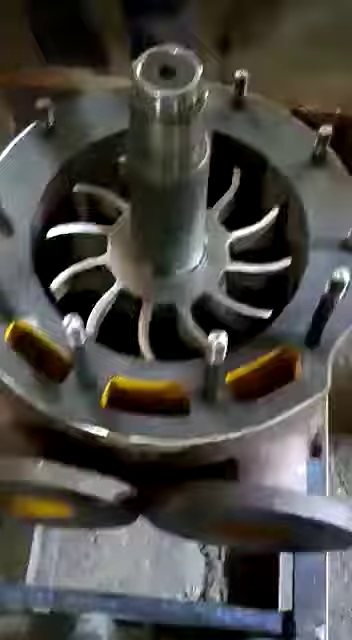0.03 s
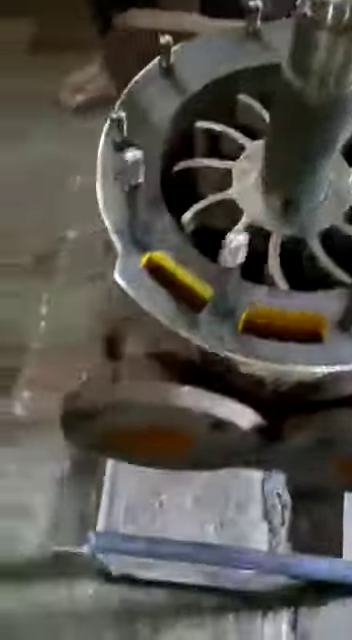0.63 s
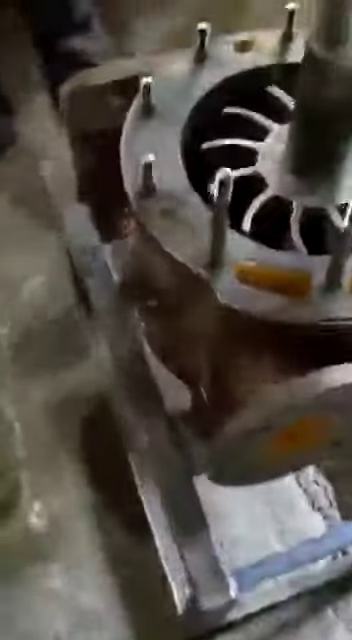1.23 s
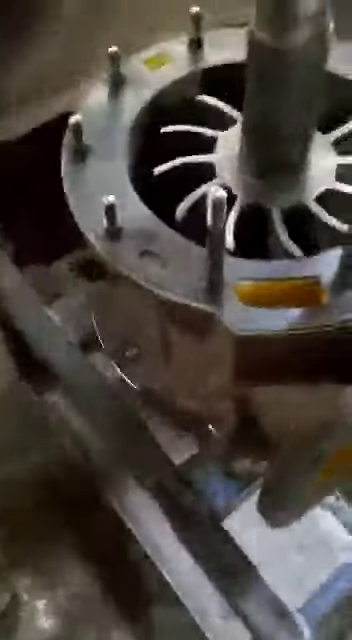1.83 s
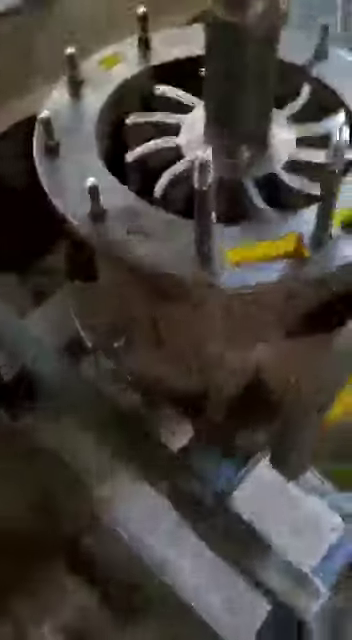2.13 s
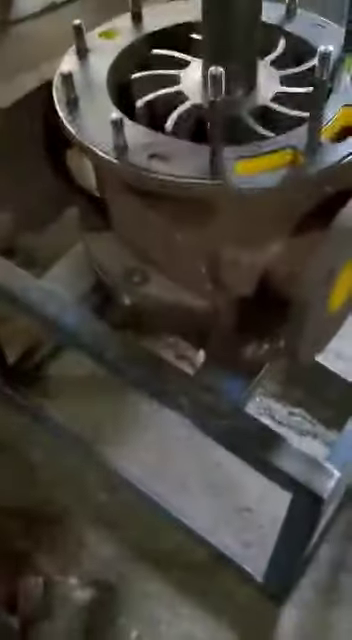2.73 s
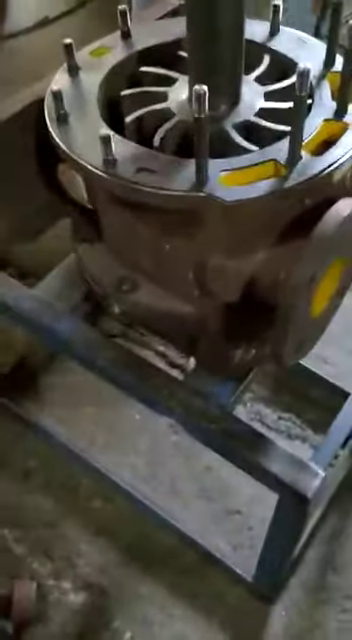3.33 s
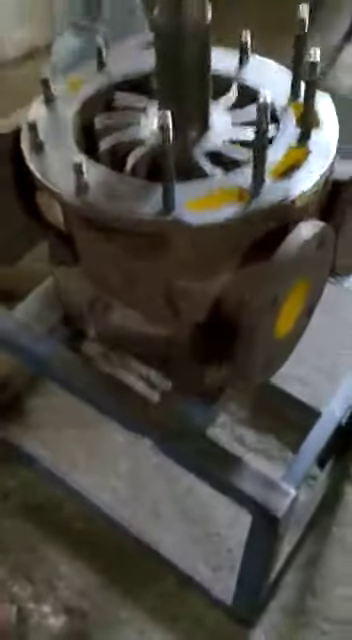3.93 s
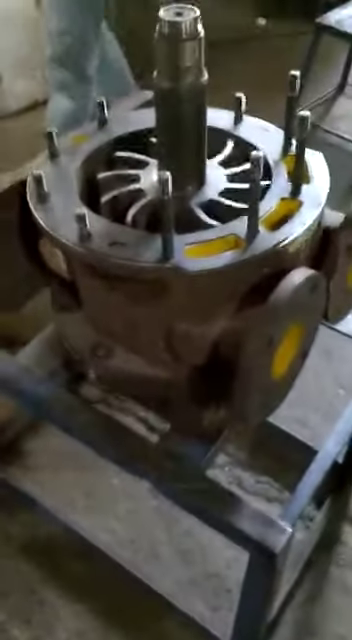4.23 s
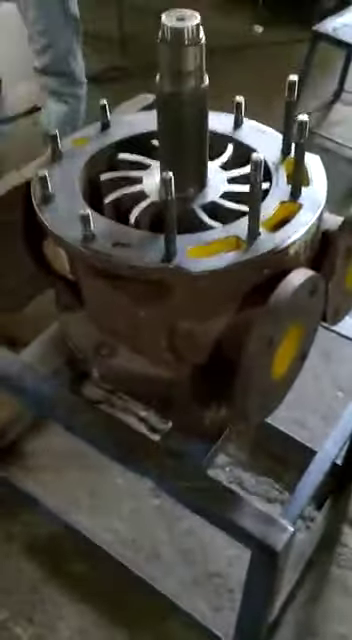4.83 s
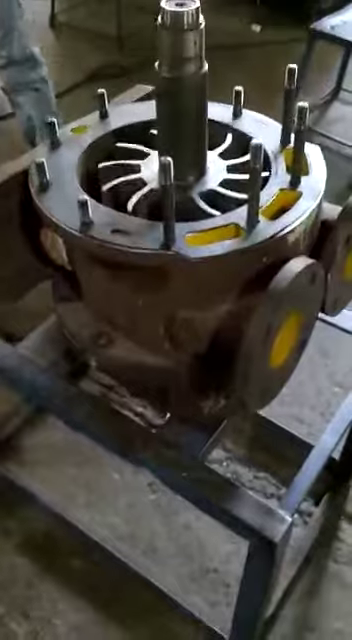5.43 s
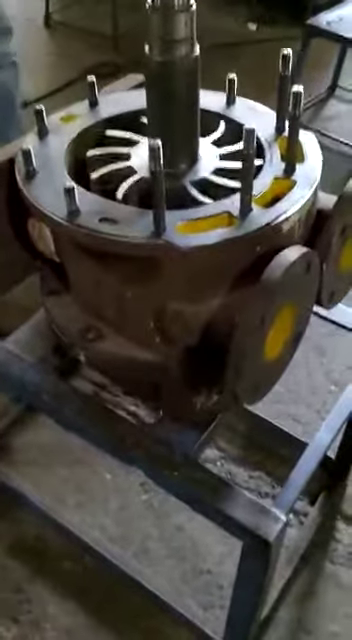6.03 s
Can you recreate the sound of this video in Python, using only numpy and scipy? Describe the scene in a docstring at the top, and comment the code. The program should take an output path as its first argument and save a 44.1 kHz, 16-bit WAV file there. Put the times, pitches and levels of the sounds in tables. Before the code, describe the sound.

A machine runs steadily in a hard-walled workshop. Its fan holds one strong, low, fluttering tone, with thin motor whines above it and a broad roar of air behind. The tones swell and dip slightly as a hand-held microphone moves around. A soft bump comes early, then a weaker one, two faint ticks with another dull bump midway, and one small sharp click near the end.

```python
"""Workshop machine with a singing fan

A machine runs steadily in a hard-walled workshop while a hand-held microphone moves round a dismantled
pump. The fan blades sing one strong tone, fluttered by the turning shaft, with thin motor whines over a
broad roar of air. Echoes form loud and quiet spots in the room (standing waves), so tones and roar swell
and fade as the microphone moves. The sound fades in; soft bumps, two faint ticks and a click join it."""
import sys
import numpy as np
from scipy import signal
from scipy.fft import rfft, irfft, next_fast_len
from scipy.io import wavfile
from scipy.ndimage import map_coordinates

SR = 44100
rng = np.random.default_rng(int(sys.argv[2]) if len(sys.argv) > 2 else 0)


def unload_wav(signal):
    """Save mono or channel-first audio to the path in sys.argv[1] as 16-bit WAV at rate SR, clipped to [-1, 1]."""
    wavfile.write(
        sys.argv[1],
        SR,
        np.round(np.clip(np.atleast_2d(signal).T, -1, 1) * 32767).astype(np.int16),
    )


N = 268569
TIME = np.arange(N) / SR

# how alike left and right sound (1 the same, 0 unrelated, -1 opposite): pitch_hz, likeness
EAR_LIKENESS = [(30, -0.3), (60, 1), (130, 0.87), (300, 1), (580, 0.51), (1240, -0.23), (2600, 0.05),
                (6000, -0.011)]


def from_db(db):
    """Turn decibels into a gain to multiply by."""
    return 10 ** (np.asarray(db) / 20)


def in_time(rows):
    """Join a table's timed points with straight lines, giving one curve per value column."""
    times, *columns = np.transpose(rows)
    return [np.interp(TIME, times, column) for column in columns]


def at_hz(points, hz):
    """Read a table between its pitches, with every octave equally wide."""
    pitches, values = np.transpose(points)
    return np.interp(np.log(hz), np.log(pitches), values)


def pan(balance_db):
    """Left and right gains that keep the total power; a positive balance leans left."""
    gains = from_db(np.array([[.5], [-.5]]) * balance_db)
    return gains / np.sqrt(np.mean(gains ** 2, axis=0))


def drift(rate):
    """A smooth random wobble of size about 1, with `rate` new values a second."""
    points = rng.standard_normal(2048)
    coarse_s = TIME[::64]
    return np.interp(TIME, coarse_s, map_coordinates(points, [coarse_s * rate], mode="wrap"))


def bell(x, centre, half_width):
    """A smooth hump of height 1."""
    return np.exp(-((x - centre) / half_width) ** 2)


def room_tone(hz, echo, rate):
    """A pure tone plus its wall echoes, whose sum shifts as the microphone moves."""
    shared = drift(rate) + 1j * drift(rate)   # complex numbers hold both strength and phase
    per_side = np.array([drift(rate) + 1j * drift(rate) for _ in range(2)])
    alike = np.clip(at_hz(EAR_LIKENESS, hz), 0, 1)
    reflections = (np.sqrt(alike) * shared + np.sqrt(1 - alike) * per_side) / np.sqrt(2)
    side_phase = (1 - alike) * np.pi / 4 * rng.choice([-1, 1]) * np.array([[1], [-1]])
    combined = (np.exp(1j * side_phase) + echo * reflections) / np.sqrt(1 + echo ** 2)
    return np.sqrt(2) * np.real(combined * np.exp(2j * np.pi * (hz * TIME + rng.random())))


def fan_tones(blade_hz=297.8, shaft_hz=31.0, throb=0.28, blade_trim_db=-0.42, overtone_trim_db=0.35):
    """Passing blades make a tone and overtones; the shaft adds a throb each turn, and side tones."""
    # the blade tone along the microphone's path: time_s, level_db (before trim), balance_db
    blade_path = [(0.45, -20.5, -5), (0.73, -19, -4.1), (1.0, -21, -3.4), (1.12, -21, -4.5),
                  (1.28, -17.5, -4), (1.45, -20, -4.2), (1.9, -18.5, -5), (2.1, -17.6, -4.2),
                  (2.25, -18.5, -4), (2.67, -17.5, -2.5), (2.95, -17, -2.5), (3.17, -19, -2.5),
                  (3.33, -15.5, -3.5), (3.6, -19, -3.5), (3.93, -17, -3), (4.28, -19, -2.7),
                  (4.45, -17, -3), (5.3, -19, -3), (5.5, -17, -3), (6.0, -18.5, -2.5)]
    # tones at 2, 3, 4 and 5 times the blade pitch along that path: time_s, level_db (before trim)
    second = [(0.45, -37), (0.66, -39), (0.8, -27), (1.02, -28.5), (1.42, -30.5), (1.72, -38.5),
              (2.15, -30), (2.38, -40), (2.65, -44), (3.7, -42), (4.45, -36.5), (5.0, -38.5), (6.0, -40)]
    third = [(0.4, -40), (1.4, -53), (1.95, -39.5), (2.5, -35.5), (3.05, -50), (3.9, -38), (5.0, -41),
             (5.9, -42)]
    fourth = [(0.35, -42), (0.7, -31), (1.0, -34), (2.15, -48), (2.55, -33.5), (3.2, -31), (4.35, -36),
              (4.75, -39), (5.0, -33), (5.4, -39), (5.9, -37)]
    fifth = [(0.6, -42), (1.1, -37), (1.9, -54), (2.15, -41), (3.2, -39), (4.7, -38), (5.9, -40)]
    # side tones from the shaft: blade_multiple, shaft_multiple, level_db, balance_db
    side_tones = [(1, 2, -39, -7), (1, 3, -42.5, -4.5)]
    # the side tone just above twice the blade pitch: time_s, level_db (before trim)
    high_side_path = [(0.7, -47), (1.0, -41), (1.6, -67), (2.4, -48), (2.8, -34), (3.05, -45),
                      (3.75, -34.5), (4.8, -38), (5.7, -47)]

    blade_db, blade_balance_db = in_time(blade_path)
    level = from_db(blade_db + blade_trim_db + 0.5 * drift(10))
    shaft_turns = shaft_hz * TIME + 0.013 * drift(3.05)
    flutter = 1 + throb * np.sin(2 * np.pi * shaft_turns)
    out = level * flutter * pan(blade_balance_db) * room_tone(blade_hz, echo=0.092, rate=9)
    overtone_trim = from_db(overtone_trim_db)
    for multiple, path, balance_db, echo in [(2, second, -8, 0.27), (3, third, -25, 0.65),
                                             (4, fourth, -9, 0.29), (5, fifth, -18, 0.54)]:
        level = overtone_trim * from_db(in_time(path))
        out += level * pan(balance_db) * room_tone(multiple * blade_hz, echo, rate=3.32)
    for blade_multiple, shaft_multiple, level_db, balance_db in side_tones:
        hz = blade_multiple * blade_hz + shaft_multiple * shaft_hz
        out += from_db(level_db) * pan(balance_db) * room_tone(hz, echo=0.32, rate=2.7)
    level = overtone_trim * from_db(in_time(high_side_path))
    return out + level * pan(-1) * room_tone(2 * (blade_hz + shaft_hz), echo=0.24, rate=3.5)


def motor_whine(thin_trim_db=-0.5):
    """The motor makes two clear whines, and thinner tones that waver with their wall echoes."""
    # the two clear whines along the microphone's path: time_s, level_db
    lower_path = [(0.4, -47), (1.0, -37), (1.3, -47), (1.55, -35), (1.95, -34), (2.3, -39.5), (3.5, -49)]
    upper_path = [(0.35, -29), (0.8, -27), (1.1, -42), (1.6, -30), (2.1, -36), (2.6, -37), (3.8, -33),
                  (5.05, -37.5), (5.35, -43), (5.8, -30)]
    # a low hum and thin whines: pitch_hz, level_db (before trim), balance_db
    thin_tones = [(77.3, -48.5, -2), (795.0, -45.5, -7), (1064.6, -46, -11), (1089.3, -45, -1),
                  (1114.2, -43, -6), (1125.3, -44, -5), (1175.6, -42.5, -9), (1217.1, -37, -11),
                  (1266.9, -43, 1), (1299.5, -42.5, -4), (1343.0, -44, -4), (1395.0, -47, -5),
                  (1420.3, -47, -5), (1458.0, -46, -10), (2779.3, -50.5, -9), (3474.3, -53, -7)]

    out = from_db(in_time(lower_path)) * pan(-2) * room_tone(hz=701.3, echo=0.51, rate=5.8)
    out += from_db(in_time(upper_path)) * pan(-1) * room_tone(hz=1150.4, echo=0.25, rate=5.18)
    for hz, level_db, balance_db in thin_tones:
        out += from_db(level_db + thin_trim_db) * pan(balance_db) * room_tone(hz, echo=0.9, rate=4.03)
    return out


def ring_boost(resonances, hz):
    """The boost in decibels near the pitches at which something likes to ring."""
    return sum(db / (1 + (2 * (hz - centre) / width) ** 2) for centre, width, db in resonances)


def air_roar(motor_hz=24.8, throb=0.024, ripple_db=1.25, ripple_hz=14, hiss_stretch=2.2):
    """Swirling air roars through the housing: alike on both sides in the bass, spread out up high."""
    # the roar's basic shape, before any boosts: pitch_hz, level_db
    roar_shape = [(25, -65), (40, -62), (55, -58), (90, -56.5), (110, -52.5), (145, -51.5), (175, -53),
                  (215, -53), (260, -53), (520, -61), (850, -59.5), (1000, -58.5), (1900, -59.5),
                  (3800, -73), (5500, -77), (6300, -81.5), (9500, -87), (11500, -92), (12550, -100),
                  (13100, -118), (14000, -150)]
    # where the housing and the room ring: pitch_hz, width_hz, boost_db
    housing_rings = [(106, 17, 4), (174.4, 22.5, 4.5), (384.6, 137, 9.5), (668, 182, 7), (919, 17, 6),
                     (1176, 47, 7), (1301, 173, 8.5), (1424, 57, 2), (3310, 430, 0.75)]
    # where the microphone's right opening rings: pitch_hz, width_hz, boost_db
    right_ring = [(10700, 1560, 9.5)]
    # how the roar leans left or right: pitch_hz, balance_db
    roar_balance = [(60, -4), (350, -3), (630, -6.5), (2000, -6), (3600, -2.5), (5400, -6), (6100, -3),
                    (9000, -9), (10500, -9.5), (12500, -2)]
    # the treble's rise and fall (only its swing is used, times hiss_stretch): time_s, level_db
    hiss_path = [(0.55, -51), (2.37, -49.5), (4.36, -50.5), (5.9, -50)]
    # swells and dips in the standing waves: pitch_hz, width_hz, middle_s, half_length_s, boost_db
    room_swells = [(100, 120, 0.26, 0.26, -4), (75, 70, 5.5, 0.43, -3), (91, 57, 4.15, 0.26, -13),
                   (70, 59, 2.2, 0.35, 2), (175, 55, 1.08, 0.34, 2.5), (159, 50, 2.35, 0.31, 1),
                   (186, 87, 4.85, 0.22, -2.5), (446, 49, 3.1, 0.26, 5), (450, 160, 4.1, 0.3, -2),
                   (550, 290, 1.25, 0.92, 2.5), (570, 140, 2.53, 0.17, 5.5), (620, 280, 6.1, 0.52, -1.5),
                   (1270, 750, 0.54, 0.24, 1.5), (1260, 320, 2.33, 0.24, -1), (1190, 70, 2.84, 0.25, 9.5),
                   (1280, 280, 4, 0.32, 2.3), (1274, 310, 4.45, 0.25, -2), (1710, 730, 5.47, 0.81, 2.5),
                   (2200, 710, 3.9, 0.78, -2), (3280, 800, 2.7, 0.45, 1.5), (10700, 2300, 0.46, 0.6, -3),
                   (11000, 2400, 5, 0.88, -2)]

    size = next_fast_len(N)
    hz = np.maximum(np.arange(size // 2 + 1) * SR / size, 1)
    shared, opposed = rfft(rng.standard_normal((2, size))) * np.sqrt(SR / 4)
    alike = np.clip(at_hz(EAR_LIKENESS, hz), -1, 1)
    air = np.sqrt(1 + alike) * shared + np.sqrt(1 - alike) * opposed * [[1], [-1]]
    # the room's many resonances leave small peaks and dips
    ripple = ripple_db * map_coordinates(rng.standard_normal(4096), [hz / ripple_hz], mode="wrap")
    colour_db = at_hz(roar_shape, hz) + ring_boost(housing_rings, hz) + ripple
    right_db = ring_boost(right_ring, hz) * [[0], [1]]
    air *= from_db(colour_db + right_db) * pan(at_hz(roar_balance, hz))

    low = 1 / (1 + (hz / 300) ** 4)
    high = 1 / (1 + (4500 / hz) ** 4)
    rumble, body, hiss = (irfft(air * share, size)[:, :N] for share in (low, 1 - low - high, high))
    rumble *= from_db(-0.95 + drift(2.36))
    body *= from_db(0.03) * (1 + throb * np.sin(2 * np.pi * motor_hz * TIME))   # one push per motor turn
    treble_db, = in_time(hiss_path)
    hiss *= from_db(-0.7 + hiss_stretch * (treble_db - treble_db.mean()))
    flutter = from_db(0.3 * drift(35))
    out = rumble + (body + hiss) * flutter
    for pitch_hz, width_hz, middle_s, half_length_s, boost_db in room_swells:
        band = irfft(air * bell(hz, pitch_hz, width_hz / 2), size)[:, :N]
        out += band * (from_db(boost_db * bell(TIME, middle_s, half_length_s)) - 1)
    return out


def bumps():
    """Dull knocks: low vibrations that die away within a few cycles."""
    # soft bumps nearby: start_s, level_db, pitch_hz, balance_db, ring_cycles
    knocks = [(0.669, -14, 116, 17, 0.9), (1.635, -27, 58.57, -6, 1.9), (3.644, -18, 103, -11, 2.1)]

    out = np.zeros((2, N))
    for start_s, level_db, pitch_hz, balance_db, ring_cycles in knocks:
        cycles = pitch_hz * np.maximum(TIME - start_s, 0)
        knock = np.sin(2 * np.pi * cycles) * np.exp(-cycles / ring_cycles)
        out += from_db(level_db) * pan(balance_db) * knock
    return out


def ticks(rattle_s=0.0034, band_hz=(3900, 7500)):
    """Two faint ticks with a brief rattle, then one sharp, bright click."""
    # two ticks and a click: start_s, level_db (before filtering), balance_db, rattle_db, top_hz
    clicks = [(3.0515, -28, 1, -9, 11000), (3.6597, -25, -10, -14, 7530), (5.4232, -19, -3, -36, 16000)]

    out = np.zeros((2, N))
    for start_s, level_db, balance_db, rattle_db, top_hz in clicks:
        spike = signal.unit_impulse(N, round(start_s * SR))
        decay = (TIME > start_s) * np.exp(-np.abs(TIME - start_s) / rattle_s)
        rattle = from_db(rattle_db) * decay * rng.standard_normal((2, N))
        soften = signal.butter(6, top_hz, fs=SR, output="sos")
        out += from_db(level_db) * pan(balance_db) * signal.sosfilt(soften, spike + rattle + 1e-18)
    b, a = signal.butter(1, band_hz, "band", fs=SR)
    return signal.lfilter(b / b[0], a, out)   # scaled so a sharp spike keeps its height


def scene():
    """The machine, with the small bumps, ticks and click."""
    return fan_tones() + motor_whine() + air_roar() + bumps() + ticks()


def record(dry, cutoff_hz=16200):
    """The sound fades in and the highest treble is cut."""
    # the rise from silence: time_s, gain
    fade_in = [(0.166, 0), (0.171, 0.13), (0.39, 1)]

    gain, = in_time(fade_in)
    treble_cut = signal.ellip(8, .2, 70, cutoff_hz, fs=SR, output="sos")
    return signal.sosfilt(treble_cut, dry * gain)


dry = scene()
out = record(dry)
unload_wav(out)
```